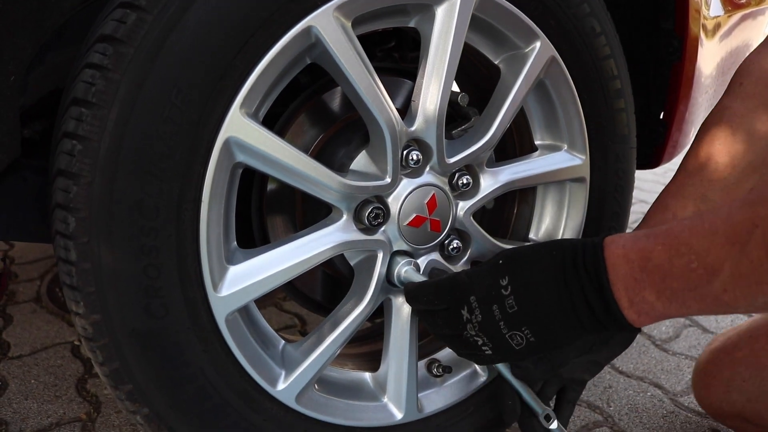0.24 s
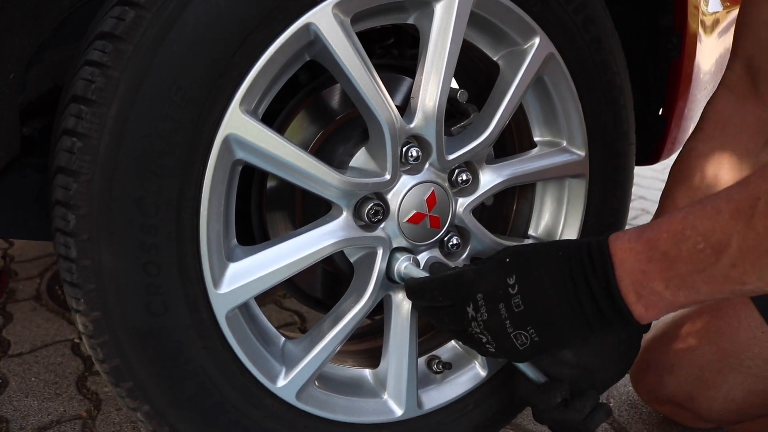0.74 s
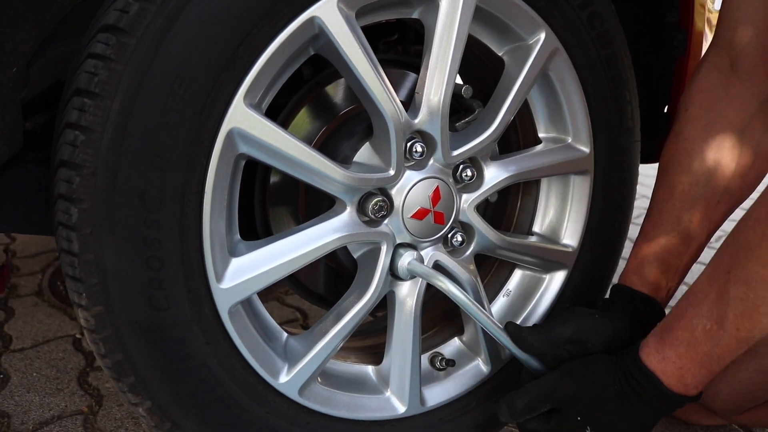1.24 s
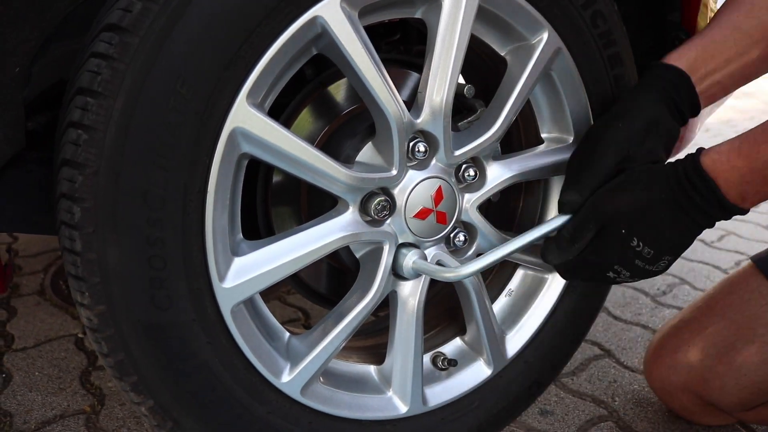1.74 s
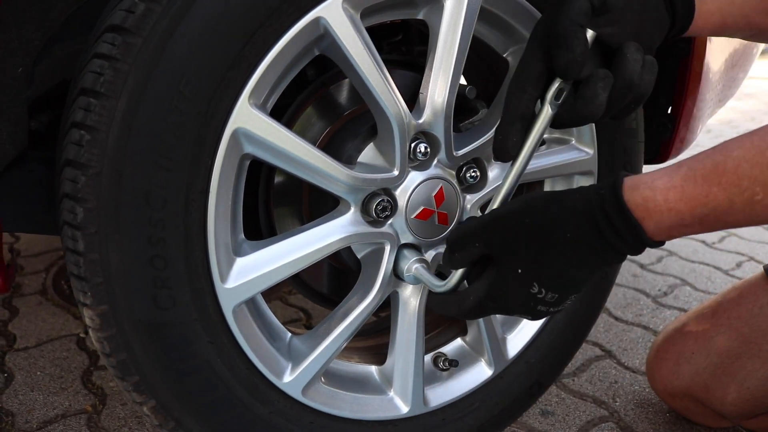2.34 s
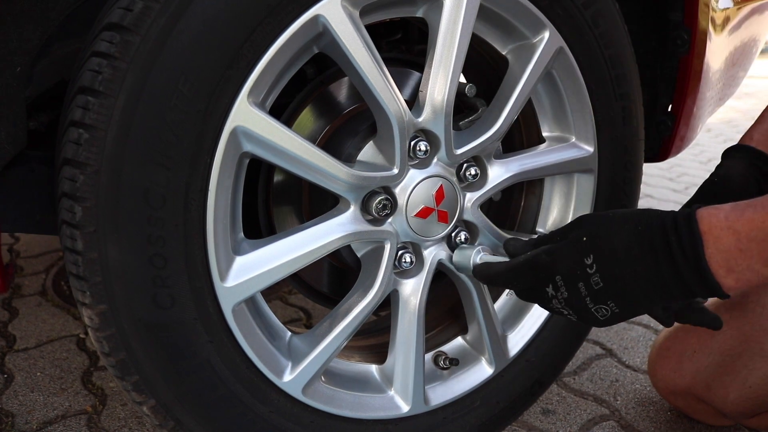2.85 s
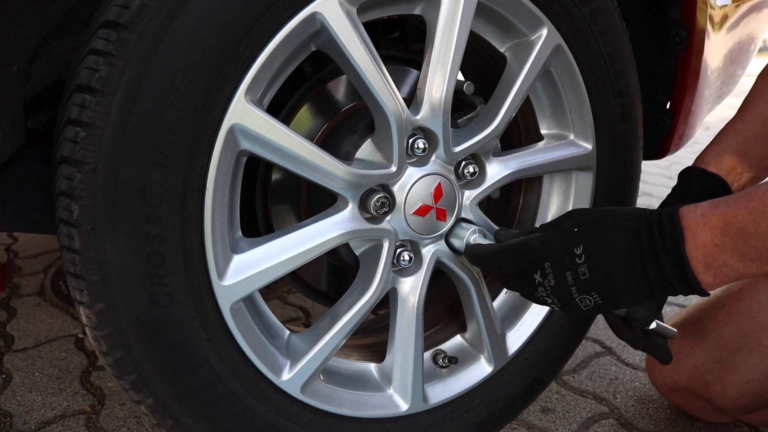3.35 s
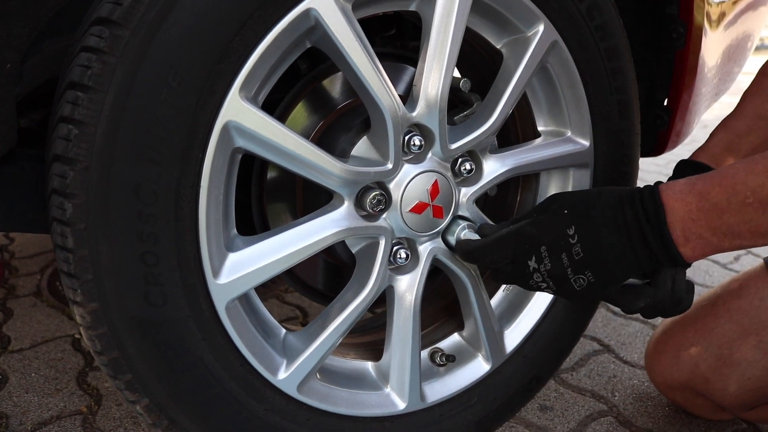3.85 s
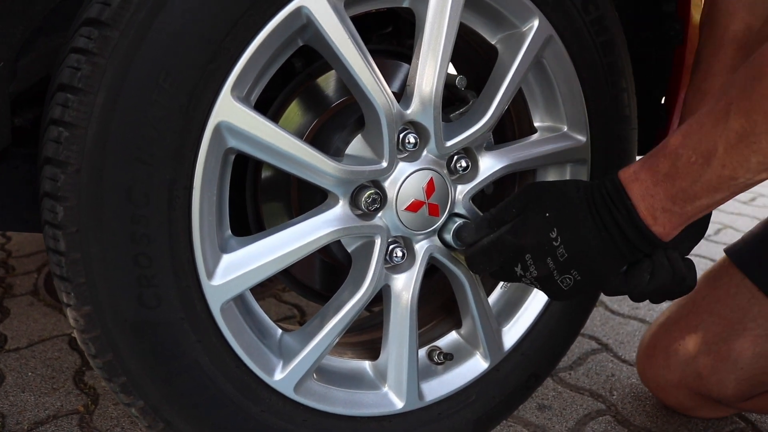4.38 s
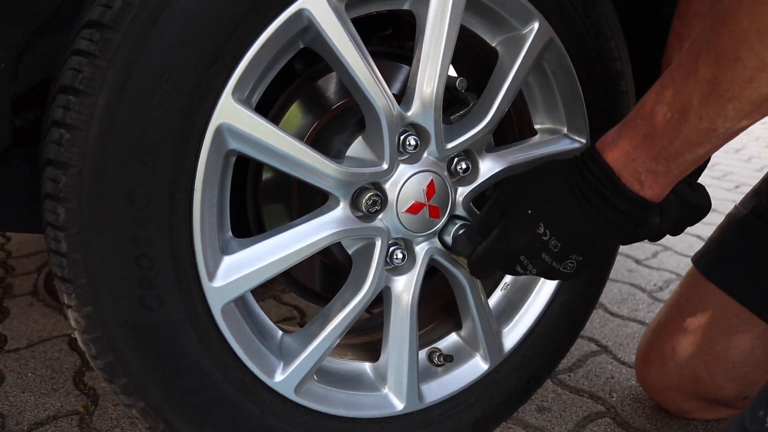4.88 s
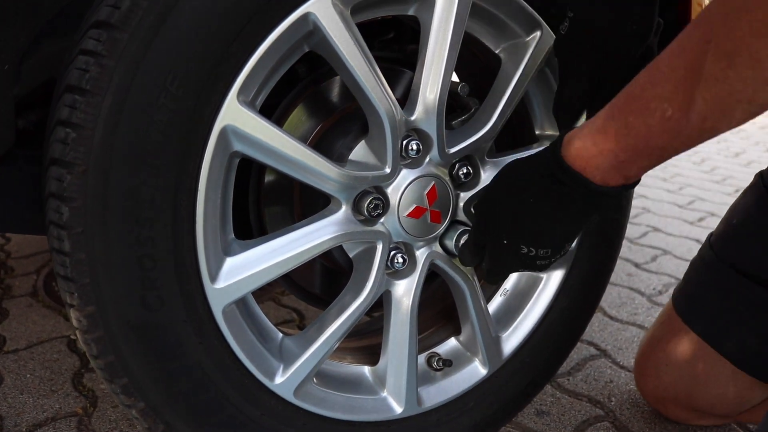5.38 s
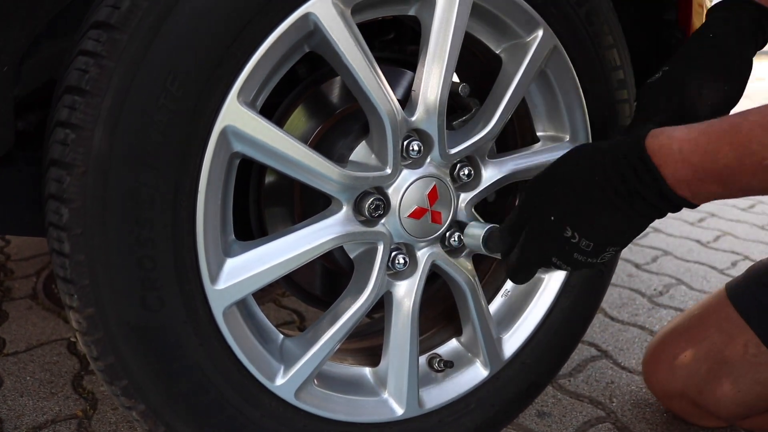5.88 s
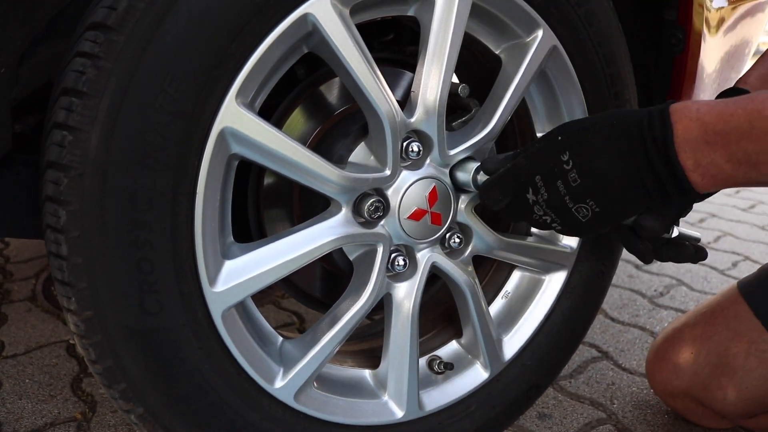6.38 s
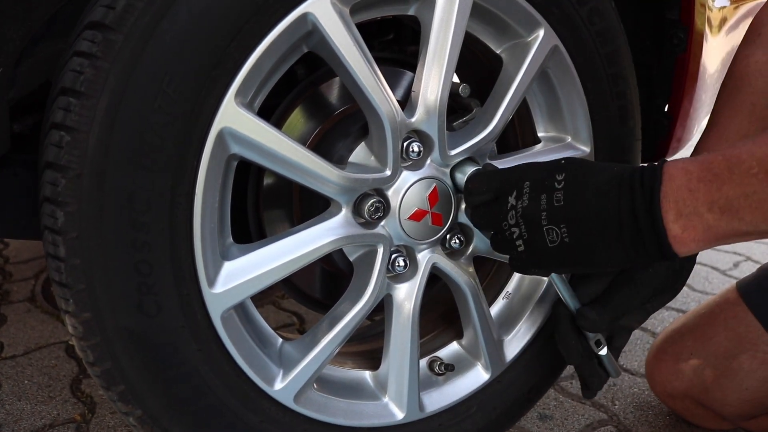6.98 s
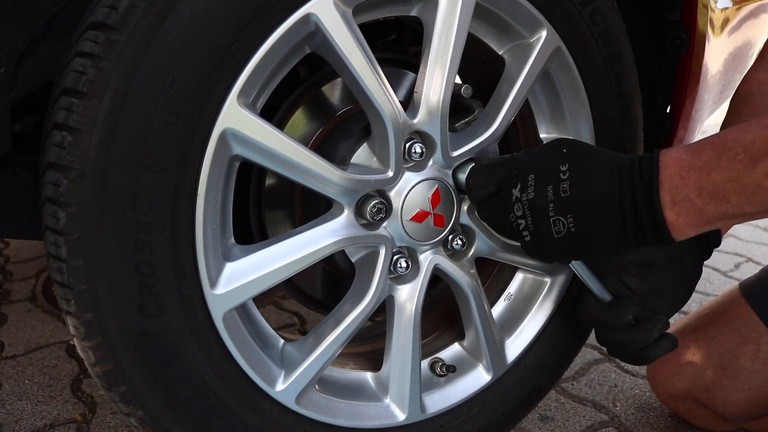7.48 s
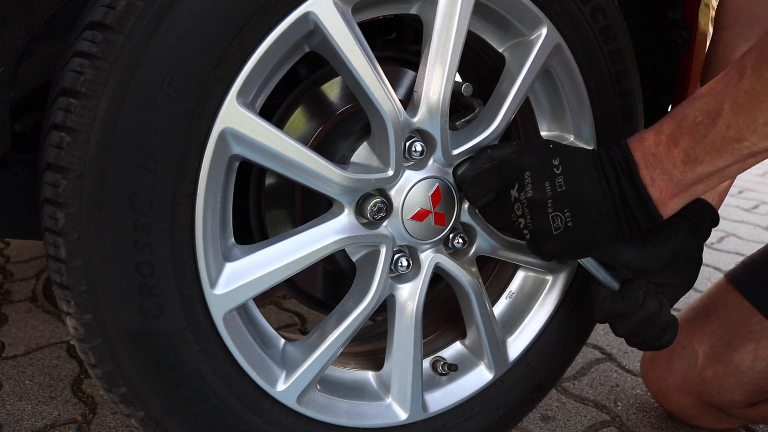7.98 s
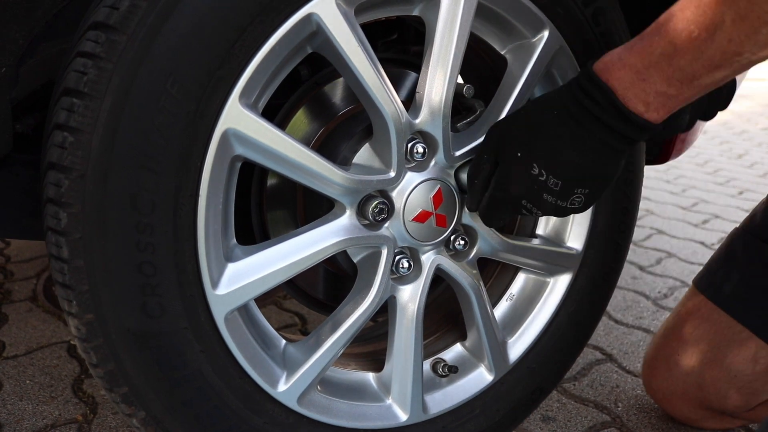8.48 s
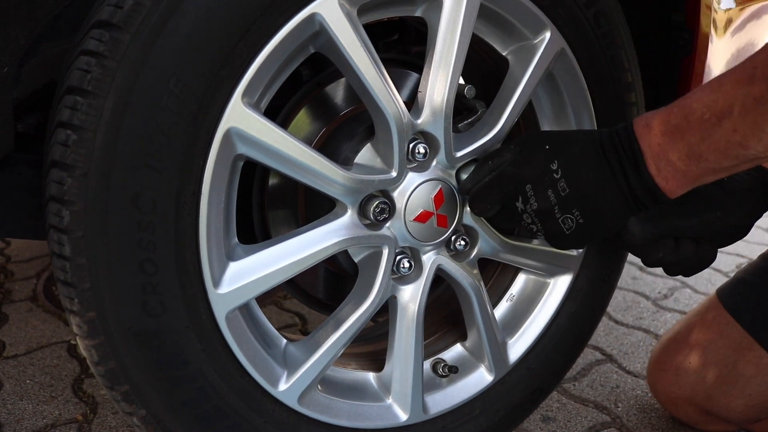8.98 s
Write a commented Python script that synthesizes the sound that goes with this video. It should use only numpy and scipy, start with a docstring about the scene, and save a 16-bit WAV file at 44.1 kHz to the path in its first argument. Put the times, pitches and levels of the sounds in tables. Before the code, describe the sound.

Sharp overloaded cracks as wheel nuts break free, separated by quiet scrapes and quick clinking rattles of a wrench socket being fitted.

```python
"""Wheel nuts are cracked loose with a steel wrench on an alloy car wheel, outdoors on paving.
Faint far rumble and hiss run throughout, with rubbing gloves in between. Small slips lead to a hard crack
near 1.5 s; the socket knocks at 2.4 to 3.2 s, a nut slips loudly at 4.3 s, more knocks come at 5.9 to 7.3 s,
and a last hard crack falls near 8.1 s. Slips ring wheel and tyre, built from fading sines and noise bands;
knocks ring the socket and wrench bar too. The loudest cracks overload a nearly mono microphone."""
import sys
import numpy as np
from scipy import signal
from scipy.fft import rfft, irfft
from scipy.io import wavfile

SR = 44100
rng = np.random.default_rng(int(sys.argv[2]) if len(sys.argv) > 2 else 0)


def materialize(psi):
    """Save the field psi as 16-bit PCM at rate SR to the path in sys.argv[1].

    A 1-D psi becomes a single channel; in a 2-D psi each row is a channel.
    """
    bounded = np.clip(np.atleast_2d(psi).T, -1, 1)
    quanta = np.round(bounded * 32767).astype(np.int16)
    wavfile.write(sys.argv[1], SR, quanta)


N = 407043

# Nuts slipping and the wrench taking up play, felt by the wheel.
# Each row: start in seconds, strength in dB, strongest pitch in Hz, fall above that pitch in dB per octave.
SLIPS = [(0.004, -28, 677, 4.5), (0.04, -45, 300, 25), (0.079, -41.5, 300, 6), (0.269, -52.5, 624, 23),
         (0.554, -49.5, 300, 5), (1.168, -36.5, 6050, 3), (1.444, -11, 2600, -1.5), (1.4863, 3, 1250, 1.5),
         (1.511, -23, 1300, 11), (1.63, -27, 760, 8.5), (1.954, -44.5, 684, 4), (2.046, -51, 696, 24),
         (3.459, -50, 1374, 12), (3.5, -37, 747, 4), (3.516, -40, 1900, 13), (3.729, -18, 650, 6),
         (4.243, -55, 558, 3), (4.29, -6.5, 2560, 2), (4.415, -39, 610, 8), (4.653, -54, 970, 17),
         (4.7252, -14.5, 710, 7), (5.074, -12.5, 1170, 13), (5.147, -32, 650, 12.5), (5.223, -44, 506, 3),
         (5.567, -48.5, 660, 4.5), (7.055, -32, 621, 5.5), (7.08, -33.5, 620, 9.5),
         (8.075, -2.5, 2750, 2.1), (8.1231, 3, 1380, 4.5), (8.368, -24, 772, 11.5),
         (8.438, -33.5, 712, 8.5), (8.651, -30, 653, 3.5), (8.806, -54.5, 716, 2),
         (9.206, -48.5, 1170, 6.5), (9.221, -35.5, 1460, 8)]
# The socket knocking on a nut. Each row: start in seconds, strength in dB, strongest pitch in Hz,
# fall above that pitch in dB per octave, chime of the socket's high pitches in dB relative to the strength.
KNOCKS = [(0.519, -51, 1924, 18, -25), (1.919, -44, 2050, 7, -14), (2.237, -46, 2030, 12, -16),
          (2.284, -47.5, 1890, 5, -13), (2.444, -31.5, 1894, -0.5, -12), (3.059, -22.5, 1350, 7.5, -13),
          (3.069, -25.5, 673, 3, -22), (3.131, -28, 1180, 1.2, -16.5), (3.148, -17.5, 2220, 8, -21),
          (3.159, -29.5, 1730, 3, -9), (3.176, -19, 1720, 3.5, -21), (3.206, -18.5, 1940, 18, -10.5),
          (4.831, -52.5, 1180, -2.1, -38), (5.861, -44, 665, 2.5, -22), (5.874, -29.5, 1660, 18, -19),
          (5.894, -17.5, 1780, 1.5, -25), (5.918, -22, 1770, 2.5, -27), (6.324, -16.5, 1970, 30, -25),
          (6.378, -24, 2000, 6, -14), (6.4245, -24, 2020, 6, -30), (6.437, -13.5, 1910, 0.9, -17),
          (6.75, -45, 639, 15, 1), (6.805, -37.5, 2010, 32.5, -16.5), (6.859, -38, 1067, 15, -25),
          (6.88, -46.5, 619, 3.5, -28), (7.3023, -10.5, 1950, 5, -30), (8.737, -43, 1930, 17.5, -10)]


def from_db(db):
    """Turn decibels into a plain multiplier."""
    return 10 ** (np.asarray(db) / 20)


def at_hz(points, hz, column=1):
    """Read a table between its rows, along a logarithmic pitch scale."""
    points = np.array(points)
    return np.interp(np.log(hz), np.log(points[:, 0]), points[:, column])


def drift(rate_hz):
    """Random wander: straight lines between random values of spread 1, drawn rate_hz times a second."""
    knots = rng.standard_normal(int(N / SR * rate_hz) + 2)
    return np.interp(np.arange(N) / SR * rate_hz, np.arange(len(knots)), knots)


def coloured(spectrum):
    """Noise whose spectrum follows a table, scaled to an average (rms) level of 1."""
    hz = np.maximum(np.fft.rfftfreq(N, 1 / SR), 10)
    white = rfft(rng.standard_normal(N))
    noise = irfft(white * from_db(at_hz(spectrum, hz)), N)
    return noise / noise.std()


def add(out, sound, start):
    """Mix a sound in from a given sample on, cutting off what runs past the end."""
    sound = sound[:max(len(out) - start, 0)]
    out[start:start + len(sound)] += sound


def microphone_hiss():
    """Steady noise in the middle, and a separate noise that makes left and right differ a little."""
    # Each row: pitch in Hz, level in dB; only the shape counts
    hiss = [(15, -34.5), (25, -5.5), (92, 0), (328, -4.5), (701, -13.5), (1580, -14.5), (1960, -10.5),
            (2190, -11.5), (6830, -14), (15000, -20), (16300, -27)]
    # Each row: pitch in Hz, tilt of the side noise against the middle one in dB; only the shape counts
    side_tilt = [(60, -4.5), (180, -7), (550, -2.5), (1650, -3.5), (4970, -3), (15000, 2)]
    side_hiss = [(hz, at_hz(hiss, hz) + tilt_db) for hz, tilt_db in side_tilt]
    return from_db(-68.5) * coloured(hiss), from_db(-71.5) * coloured(side_hiss)


def aftermath(rest_db, push_db, share, rise_s, push_fade_s):
    """Loudness that swells after every blow and dies back to rest, as struck metal stirs and settles."""
    pushes = np.zeros(N)
    for s, strength_db, *_ in SLIPS + KNOCKS:
        pushes[round(s * SR)] = from_db(push_db + share * strength_db)
    fading = signal.lfilter([1], [1, -from_db(-60 / (push_fade_s * SR))], pushes)   # 60 dB in push_fade_s
    keep = np.exp(-1 / (rise_s * SR))
    smooth = signal.lfilter([1 - keep], [1, -keep], fading)   # rises slowly, and so also dies more slowly
    return from_db(rest_db) + smooth


def swells(strokes):
    """Bell-shaped loudness of rubbing strokes."""
    t = np.arange(N) / SR
    return sum(from_db(level_db) * np.exp(-((t - middle_s) / half_s) ** 2)
               for middle_s, half_s, level_db in strokes)


def rumble():
    """Low noise, always faintly there, that swells as the car body rumbles after a blow."""
    # Each row: pitch in Hz, level in dB; only the shape counts
    low_noise = [(25, 0.5), (50, 1), (100, 1.5), (160, -2), (300, -25), (600, -44.5)]
    loudness = aftermath(rest_db=-77.5, push_db=-54, share=1.04, rise_s=0.54, push_fade_s=0.82)
    return loudness * from_db(1.3 * drift(45)) * coloured(low_noise)


def rubbing():
    """Mid-pitched noise: the socket sliding on a nut, and the wheel murmuring on after a blow."""
    # Each row: pitch in Hz, level in dB; only the shape counts
    mid_noise = [(150, -30), (350, -2.5), (680, 5.5), (1300, 0), (2000, -2.5), (3000, -13), (6000, -33.5)]
    # The socket sliding on a nut. Each row: middle in seconds, half length in seconds, level in dB
    scrapes = [(.4, 0.21, -70), (2.436, 0.0073, -54.5), (5.15, 0.017, -46.5), (5.5, 0.036, -70.5),
               (5.63, 0.038, -72), (5.865, 0.018, -58), (6.87, 0.021, -68), (7.297, 0.0085, -48.5),
               (9.2, 0.023, -70.5)]
    murmur = aftermath(rest_db=-76.5, push_db=-59, share=0.85, rise_s=0.52, push_fade_s=1)
    return (murmur + swells(scrapes)) * from_db(0.93 * drift(55)) * coloured(mid_noise)


def rustle():
    """Bright uneven noise of gloves and cloth brushing past."""
    # Each row: pitch in Hz, level in dB; only the shape counts
    bright_noise = [(1000, -9), (2500, 1.5), (5000, -3.5), (8200, -1), (10500, -5.5), (13500, -4),
                    (16000, -10)]
    # Glove and cloth strokes. Each row: middle in seconds, half length in seconds, level in dB
    strokes = [(.28, 0.013, -63), (.565, 0.014, -65), (1.0, 0.043, -71), (1.13, 0.061, -71),
               (1.82, 0.1, -63.5), (2.25, 0.087, -67.5), (2.65, .09, -71), (4.0, 0.039, -66.5),
               (4.1, 0.025, -68.5), (5.14, 0.044, -59.5), (5.7, 0.05, -73), (7.49, 0.031, -68),
               (8.54, 0.08, -65), (9.0, 0.072, -80)]
    return swells(strokes) * from_db(1.2 * drift(160)) * coloured(bright_noise)


def gripped(s):
    """Whether the gloves hold wheel and wrench firmly at this moment."""
    # Each row: start in seconds, end in seconds
    grips = [(4.2, 6.0), (8.0, 9.3)]
    return any(start < s < end for start, end in grips)


def contact_db(hz, top_hz, fall_db, soft_db):
    """A contact drives the pitches near its strongest one most; a soft one loses the very top."""
    octaves = np.log2(hz / top_hz)
    slope_db = np.where(octaves > 0, -fall_db * octaves, 5.6 * octaves)
    return slope_db - soft_db * np.maximum(np.log2(hz / 7000), 0)


def ringing(modes, gains_db, stretch, seconds, spread_db, detune=0):
    """Fading sines, each with its own random strength and sign, and retuned if detune is given."""
    hz, level_db, fade_s = np.transpose(modes)[:, :, None]
    t = np.arange(int(seconds * SR)) / SR
    luck = rng.standard_normal((3, len(modes), 1))
    gain = from_db(level_db + gains_db + spread_db * luck[0]) * np.sign(luck[1])
    fading = np.exp(-np.log(1000) * t / (fade_s * stretch))   # down 60 dB after fade_s * stretch
    sines = np.sin(2 * np.pi * hz * (1 + detune * luck[2]) * t)
    return np.sum(gain * fading * sines, axis=0)


def clatter(contact, stretch, seconds):
    """Overtones too dense to tell apart: half-octave noise bands, each with a crack, a body and a long tail."""
    # Each row: pitch in Hz, level in dB before the contact shapes it, fade time of the body
    # (seconds for 60 dB, before stretching)
    overtones = [(300, -6, 0.086), (430, -12, 0.12), (720, 4, 0.041), (1300, 3.5, 0.015), (2580, -1.5, .08),
                 (5600, -4, 0.032), (9720, -7.5, 0.093), (13190, -9.5, 0.11)]
    t = np.arange(int(seconds * SR)) / SR
    out = np.zeros(len(t))
    for low_hz in 250 * 2 ** np.arange(0, 5.6, .5):
        hz = low_hz * 2 ** .25   # middle of the band
        band_filter = signal.butter(2, [low_hz, low_hz * np.sqrt(2)], "band", fs=SR, output="sos")
        band = signal.sosfilt(band_filter, rng.standard_normal(len(t)))
        level = from_db(at_hz(overtones, hz) + contact_db(hz, *contact)) / band.std()
        fall = np.log(1000) * t / (at_hz(overtones, hz, column=2) * stretch)
        crack = from_db(7 + 1.4 * max(np.log2(hz / 2000), 0)) * np.exp(-fall * 5.8)
        body = np.exp(-fall)
        tail = from_db(-20.5 - 2.8 * max(np.log2(hz / 2500), 0)) * np.exp(-fall / 5.6)
        out += level * band * (crack + body + tail)
    return out


def answer(s, strength_db, top_hz, fall_db, at_full, softer):
    """Softer blows put more of themselves into tyre and free rim, and ring longer; a grip quiets long rings."""
    thud_db, rim_db, stretch, air_db = np.array(at_full) - strength_db * np.array(softer)
    held = gripped(s)
    thud_db -= 5 * np.log2(top_hz / 1000)   # a sharp contact moves the tyre less
    stretch *= (1000 / top_hz) ** 0.24   # and its ringing is shorter
    return dict(top_hz=top_hz, fall_db=fall_db, thud_db=thud_db, stretch=max(stretch, .3),
                rim_db=rim_db - 7.5 * held, air_db=air_db - 8.5 * held)


def thud_and_hum(thud_db, air_db):
    """The thud of rubber, slightly late because rubber is soft, and a long low hum of the free wrench bar that
    also swells in late."""
    # Rubber. Each row: pitch in Hz, level in dB before the blow's share, seconds to fade by 60 dB
    rubber = [(69.4, -8, 0.13), (100, -3.5, 0.13), (125.4, -2.5, .3), (193, 3.5, 0.074)]
    # Low hum of the wrench bar hanging free. Each row: pitch in Hz, level in dB before the blow's share, fade
    # time in s before shortening
    low_hum = [(242, 0, 1.4)]
    parts = [ringing(rubber, thud_db, 1, 0.65, spread_db=3.0),
             ringing(low_hum, air_db, 0.77, 0.84, spread_db=4.0)]
    return [part * (1 - np.exp(-np.arange(len(part)) / (0.002 * SR))) for part in parts]


def wheel(top_hz, thud_db, fall_db, rim_db, stretch, air_db, clusters_db, soft_db, high_rim_db):
    """What tyre, wheel and rim answer to one blow: metal rings at its own pitches, the rim longest."""
    # Alloy wheel held by hub and hands; each row stands for a cluster of close pitches.
    # Each row: pitch in Hz, level in dB before the contact shapes it, fade time in s before stretching
    wheel_modes = [(638, -2, 0.047), (701, -5.5, 0.13), (790, -15.5, 0.029), (1032, -13, 0.19),
                   (1193, -8.5, 0.15), (1341, 2.5, 0.061), (1570, -12.5, 0.085), (1850, -14, 0.044),
                   (2344, -8.5, 0.032), (2510, -2.5, 0.068), (2655, 2, 0.043), (2917, -10.5, 0.2),
                   (3084, -12.5, 0.049), (4455, -10, 0.086), (4790, -12.5, 0.11), (5215, -8.5, 0.055),
                   (5740, -12, 0.064), (5850, -14.5, .08), (7430, -15.5, 0.089), (10500, -12, 0.023),
                   (8030, -17.5, 0.08), (8230, -16.5, 0.057), (11240, -5.5, .06)]
    # Rim pitches left free to ring on. Each row: pitch in Hz, level in dB before the contact shapes it,
    # fade time in s before shortening
    rim = np.array([(636, -2, .35), (706, -9, .5), (1017, -10, .35), (1174, -8, .55), (1271, -6, 1.3),
                    (1288, -4, .5), (1340, -8, .35), (1593, -24, 1.3), (1712, -17, .7), (2680, -5, .35),
                    (2775, -1, .5), (2945, -9, .35), (3090, -10, .35), (4037, -18, .4), (5491, -18, .38),
                    (7465, -19, .5), (11360, -18, .35)])
    contact = (top_hz, fall_db, soft_db)
    clusters = np.tile(wheel_modes, (3, 1))   # three copies, detuned apart below
    clusters_gain_db = contact_db(clusters[:, :1], *contact) + clusters_db
    rim_hz = rim[:, :1]
    rim_gain_db = rim_db + high_rim_db * (rim_hz > 2000) + 0.68 * contact_db(rim_hz, *contact)
    return thud_and_hum(thud_db, air_db) + [
        ringing(clusters, clusters_gain_db, stretch, 0.46, spread_db=1.0, detune=0.016),
        ringing(rim, rim_gain_db, 0.77, 0.81, spread_db=4.0),
        from_db(-17.5) * clatter(contact, stretch, 0.29)]


def chatter(sound):
    """The first touch of the loose socket and four weaker, uneven repeats within 11 ms."""
    out = sound.copy()
    for late, luck in rng.random((4, 2)):
        add(out, from_db(-3.5 - 3.4 * luck - 3.5 * late) * sound, round(late * .011 * SR))
    return out * from_db(-3)


def strike(out, parts, s, strength_db, top_hz):
    """Mix in one blow: a contact builds up over about a cycle of its strongest pitch."""
    for part in parts:
        steps = np.arange(len(part))
        onset = 1 - np.exp(-steps / (1.1 / top_hz * SR))
        fade = np.minimum(steps[::-1] / (len(part) / 4), 1)   # the last quarter fades to nothing
        add(out, from_db(strength_db) * part * onset * fade, round(s * SR))


def slips():
    """Nuts jerk loose under the wrench and ring the wheel, rim and tyre."""
    out = np.zeros(N)
    for s, strength_db, top_hz, fall_db in SLIPS:
        # For a 0 dB blow, and the rise per dB softer: tyre thud in dB, rim in dB, stretch, low hum in dB
        reply = answer(s, strength_db, top_hz, fall_db,
                       at_full=(-30, -36.5, 0.7618, -45.5), softer=(0.27, .12, 0.013, 0.13))
        parts = wheel(**reply, clusters_db=-13.0, soft_db=0.0, high_rim_db=-0.34)
        strike(out, parts, s, strength_db, top_hz)
    return out


def knocks():
    """The socket rattles on a nut: steel socket and wrench bar ring along with wheel and tyre."""
    # Wrench socket. Each row: pitch in Hz, level in dB before the knock shapes it,
    # fade time in s before stretching
    socket = np.array([(1600, -8, .06), (1720, -5, .07), (1911, -3, .1), (2030, -4, .09), (2130, -7, .07),
                       (2230, -8, .09), (4090, -6, .12), (4900, -10, .1), (5975, -4, .1), (7880, -10, .15),
                       (8110, -14, .17), (8950, -13, .06), (11150, -12, .11), (13900, -28, .06),
                       (15650, -14, .07)])
    # Wrench bar hanging free. Each row: pitch in Hz, level in dB before the knock's share,
    # fade time in s before shortening
    bar_modes = [(1997, -3, 1.6), (2046, -3, 1.0)]
    socket_hz = socket[:, :1]
    starts = np.transpose(KNOCKS)[0]
    free_s = np.diff(starts, append=N / SR + 1).clip(0, 1)   # the next knock stops the bar
    out = np.zeros(N)
    for (s, strength_db, top_hz, fall_db, chime_db), bar_s in zip(KNOCKS, free_s):
        # Same four columns as for the slips
        reply = answer(s, strength_db, top_hz, fall_db,
                       at_full=(-41, -37.5, 0.7952, -45), softer=(0.41, .15, 0.013, 0.019))
        socket_db = np.where(socket_hz > 3000, chime_db, -11.5)
        socket_db = socket_db + .5 * contact_db(socket_hz, top_hz, fall_db, 0)
        steel = ringing(socket, socket_db, 0.81 * reply["stretch"], 0.16, spread_db=5.0, detune=0.0042)
        bar = ringing(bar_modes, -44 - 12 * gripped(s), 0.83, bar_s, spread_db=1.5)
        touching = wheel(**reply, clusters_db=-17.5, soft_db=36.5, high_rim_db=-10.5) + [steel]
        strike(out, [chatter(part) for part in touching] + [bar], s, strength_db, top_hz)
    return out


def echoes(sound):
    """A few dull reflections from paving and car body."""
    # Each row: delay in seconds, level in dB
    reflections = [(.0045, -24), (.011, -18), (.022, -20)]
    dull = signal.lfilter([.4], [1, -.6], sound)
    out = sound.copy()
    for s, level_db in reflections:
        add(out, from_db(level_db) * dull, round(s * SR))
    return out


def scene():
    """Background, handling and blows in the middle; only the side hiss differs between left and right."""
    hiss, side = microphone_hiss()
    handling = rumble() + rubbing() + rustle()
    mid = hiss + handling + echoes(slips() + knocks())
    return np.array([mid + side, mid - side])


def record(dry):
    """The loudest cracks hit the microphone's ceiling; then the treble above about 16 kHz is cut."""
    clipped = np.clip(dry, -.95, .95)
    treble_cut = signal.cheby2(12, 50, 16000 * 1.03, fs=SR, output="sos")
    return signal.sosfilt(treble_cut, clipped)


dry = scene()
out = record(dry)
materialize(out)
```